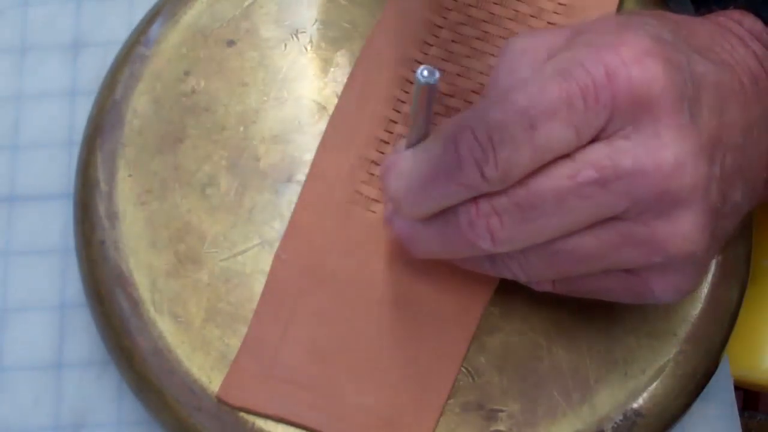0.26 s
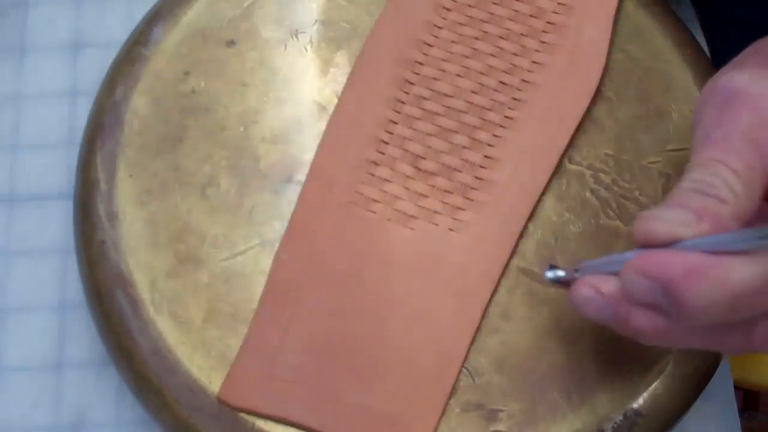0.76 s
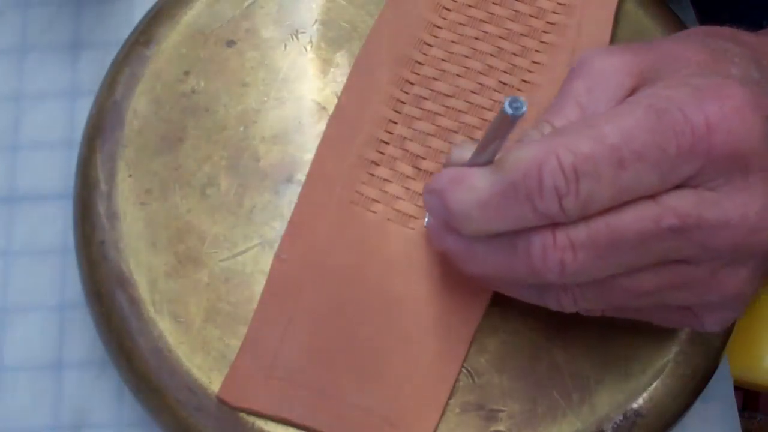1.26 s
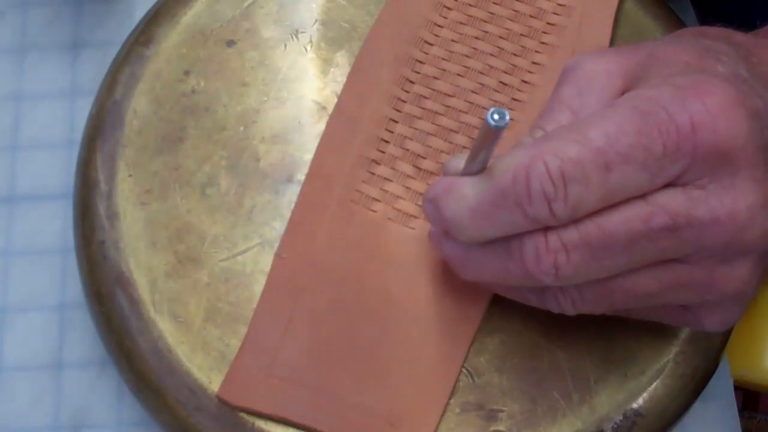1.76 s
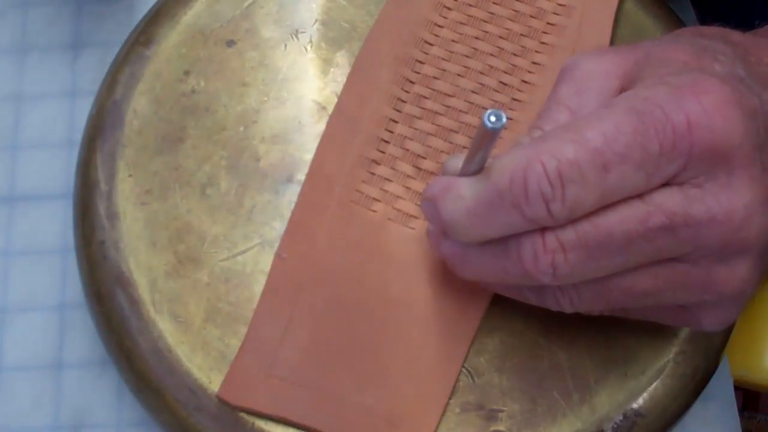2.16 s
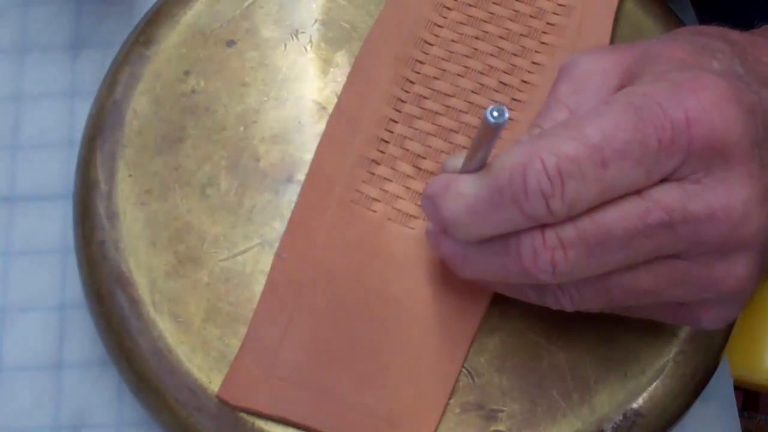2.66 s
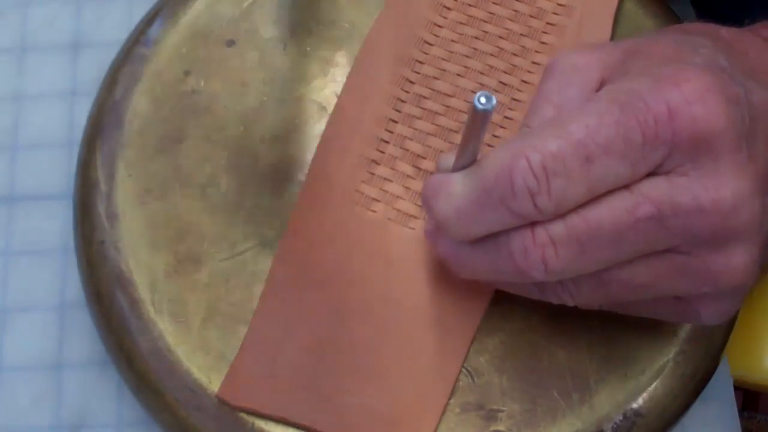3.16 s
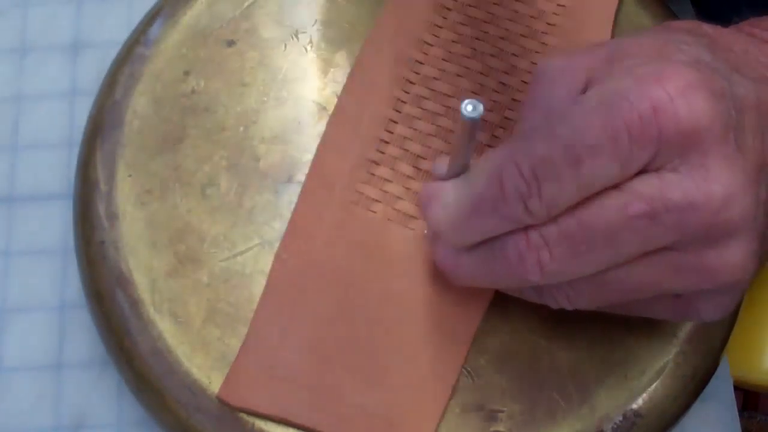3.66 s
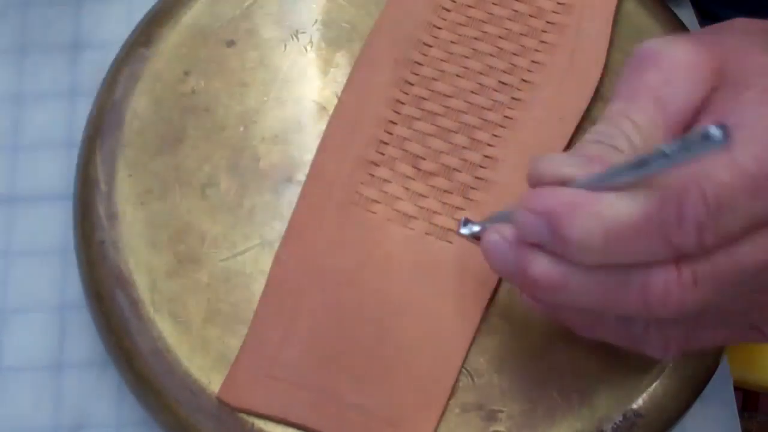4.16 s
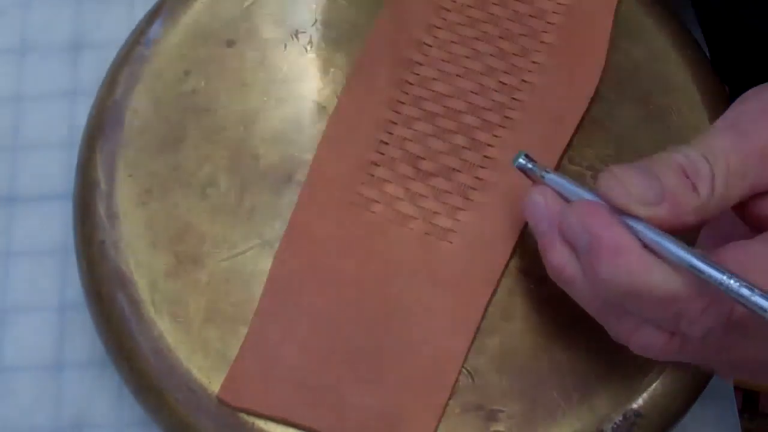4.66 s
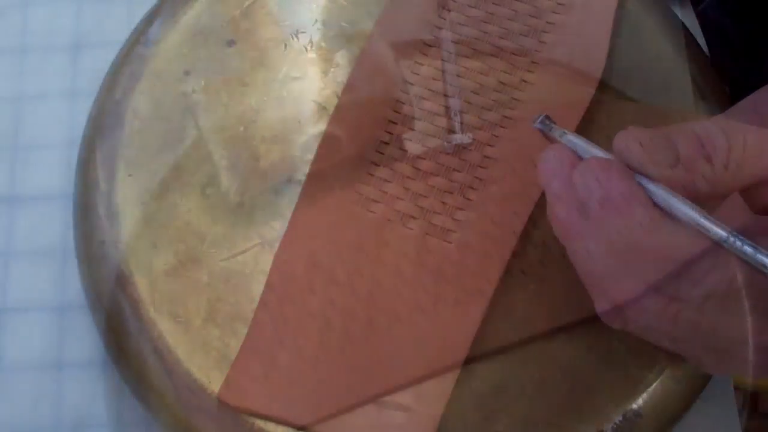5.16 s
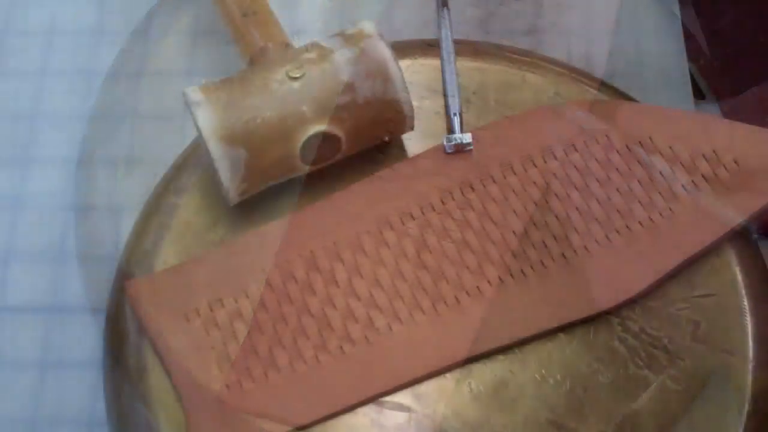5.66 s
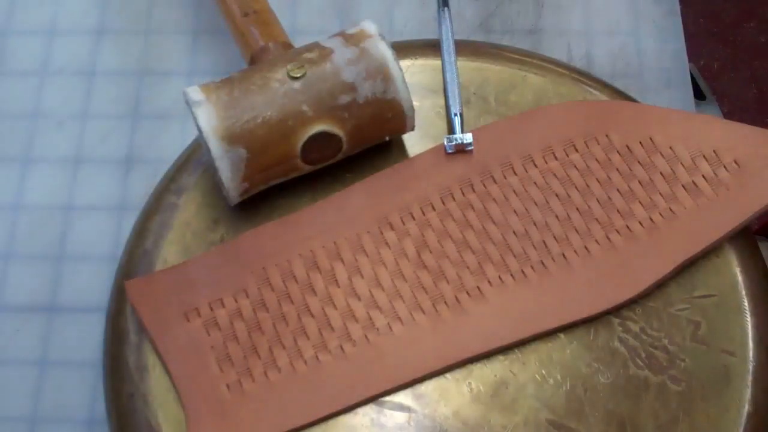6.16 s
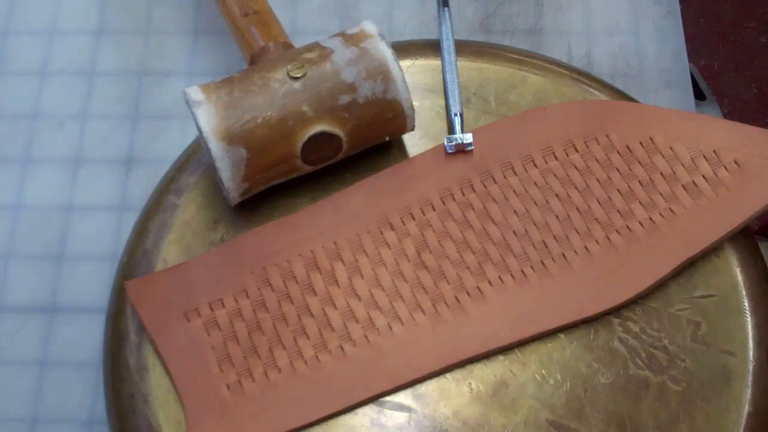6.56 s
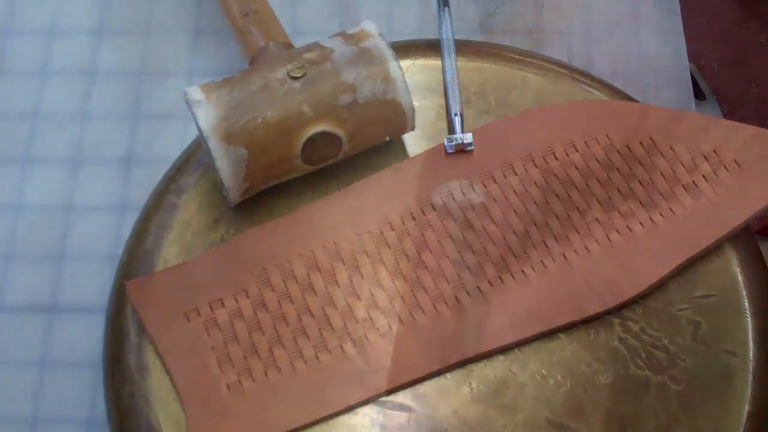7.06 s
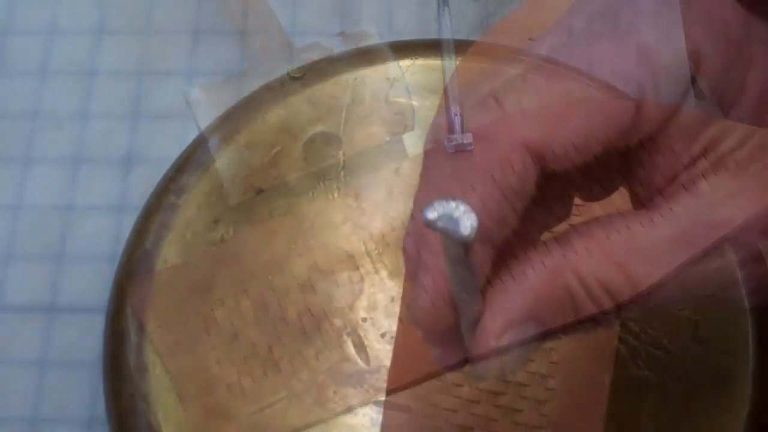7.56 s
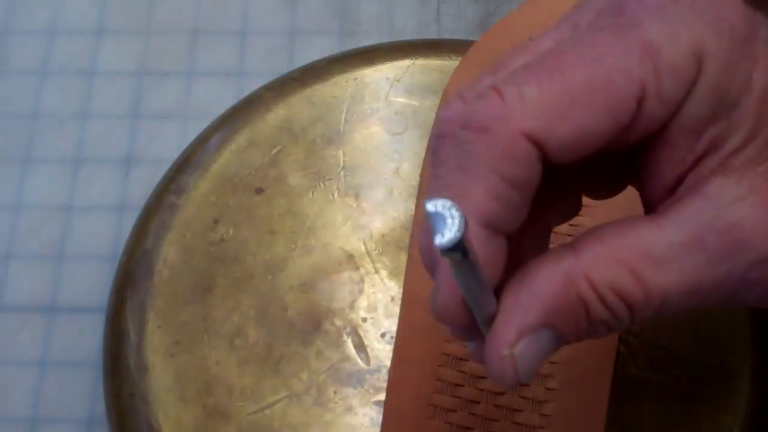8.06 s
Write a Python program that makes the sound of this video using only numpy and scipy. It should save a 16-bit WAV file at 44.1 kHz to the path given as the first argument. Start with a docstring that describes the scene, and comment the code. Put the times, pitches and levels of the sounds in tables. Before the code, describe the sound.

A rawhide mallet hits a steel stamp twice in quick succession, driving it into leather on a brass tray with sharp cracks and a brief metallic ring. About three seconds later comes a second pair. The mallet then thuds and clatters onto the bench, and hands lightly tap and rub the work. The microphone is close, in a small workshop with a steady low hum and thin motor whine.

```python
"""Leather tooling at the workbench

A stereo microphone stands close to a brass tray. A rawhide mallet drives a steel stamp into leather in
two pairs of blows; steel, tray and bench ring, and each blow overloads the input and ducks the gain.
The mallet is dropped on the bench. Hands tap and rub the work over room air, hum and a small motor."""
import sys
import numpy as np
from scipy import signal
from scipy.fft import rfft, irfft
from scipy.io import wavfile
from scipy.ndimage import minimum_filter1d

SR = 44100
rng = np.random.default_rng(int(sys.argv[2]) if len(sys.argv) > 2 else 0)


def wrap_up_sound(samples):
    """Save the sound to the file named by the first command line argument, as 16-bit audio."""
    columns = np.atleast_2d(samples).T
    # keep every value between -1 and 1, then stretch to whole-number steps
    tamed = np.clip(columns, -1, 1)
    steps = np.round(tamed * 32767).astype(np.int16)
    wavfile.write(sys.argv[1], SR, steps)


N = 365588
TIME = np.arange(N) / SR
T = np.arange(SR) / SR  # one second of ringing

# modes of the bench top: f/Hz, level/dB, t60/s
BENCH_TOP = [(76, -39, 0.5), (121.3, -38, 0.58), (155.5, -14.5, 0.27), (175, -37, 0.76), (239, -19.5, 0.25),
             (279.5, -30, 0.76), (349.4, -22, 0.38), (396.5, -31, 0.36), (463, -24.5, 0.45)]


def gain_of(db):
    """Decibels to amplitude."""
    return 10 ** (np.asarray(db) / 20)


def unit_rms(x):
    """Scales to rms 1."""
    return x / np.sqrt(np.mean(x ** 2) + 1e-20)


def at_hz(points, hz):
    """Reads a table on a log-frequency axis."""
    f, value = np.transpose(points)
    return np.interp(np.log(hz + 1), np.log(f + 1), value)


def add(mix, s, sound):
    """Adds a sound to both channels at time s."""
    part = mix[:, round(s * SR):][:, :sound.shape[-1]]
    part += sound[..., :part.shape[1]]


def low_pass(x, hz):
    """Steep band limit."""
    return signal.oaconvolve(x, signal.firwin(401, hz, window=("kaiser", 9), fs=SR)[None], "same")


def low_cut(x, hz, order=2):
    """Gentle bass roll-off."""
    return signal.sosfilt(signal.butter(order, hz, "high", fs=SR, output="sos"), x)


def drift(rate_hz):
    """Random wander of rms 1, mostly slower than rate_hz."""
    roll_off = 1 + (np.fft.rfftfreq(N, 1 / SR) / rate_hz) ** 4
    return unit_rms(irfft(rfft(rng.standard_normal(N)) / roll_off, N))


def diffuse(spectrum, size):
    """Coloured noise of rms 1 at two close capsules: alike in the bass, unrelated in the treble."""
    # likeness of left and right: f/Hz, coherence
    coherence = [(60, 0.7), (300, 0.94), (700, 0.82), (1400, 0.52), (3100, 0.018), (7000, 0.0075)]
    hz = np.fft.rfftfreq(size, 1 / SR)
    mid, side = np.exp(2j * np.pi * rng.random((2, len(hz))))
    alike = np.clip(at_hz(coherence, hz), -1, 1)
    mid, side = mid * np.sqrt(1 + alike), side * np.sqrt(1 - alike)
    return unit_rms(irfft(np.array([mid + side, mid - side]) * gain_of(at_hz(spectrum, hz)), size))


def ring(modes):
    """Dying sines (f/Hz, level/dB, t60/s), neighbours swinging in opposite directions."""
    return sum((-1) ** k * gain_of(db - 60 * T / t60) * np.sin(2 * np.pi * hz * T)
               for k, (hz, db, t60) in enumerate(modes))


def room_tail(spectrum):
    """Scattered reflections of energy 1 a channel, each band dying at its own speed."""
    # reverberation of the workshop: f/Hz, t60/s
    decay = [(100, 0.33), (500, 0.42), (1500, 0.29), (4000, 0.37), (8000, 0.32), (14000, 0.18)]
    hz, t, bands = signal.stft(diffuse(spectrum, SR), SR, nperseg=256)
    bands = bands * gain_of(-60 * t / at_hz(decay, hz)[:, None])
    tail = signal.istft(bands, SR, nperseg=256)[1][:, :SR] * (1 - np.exp(-T / 0.00086))
    return tail / np.sqrt((tail ** 2).sum() / 2)


def in_room(x, wet_db, treble_db):
    """Direct sound plus the workshop's reflections."""
    reflections = room_tail([(50, 0.00142), (900, 0.0064), (2500, treble_db), (15000, treble_db)])
    return x + gain_of(wet_db) * signal.fftconvolve(x, reflections, axes=1)[:, :N]


def room_air(wash_fade, air_db=-50.5, wash_db=-60):
    """Moving air and microphone hiss; a low wash fades in under them."""
    # spectrum of air and hiss: f/Hz, level/dB
    air = [(25, -19.5), (80, -8), (140, -8.5), (200, -8), (290, -1), (450, -4.5), (750, -5), (1100, -6),
           (1400, -4.5), (1800, -13), (3000, -14.5), (7000, -17), (11000, -17.5), (14000, -14.5)]
    # spectrum of the wash: f/Hz, level/dB
    wash = [(60, -45), (90, -20), (115, 4.5), (190, -9), (290, 6), (420, -0.5), (800, -25), (3000, -64)]
    steady = gain_of(air_db) * diffuse(air, N) * gain_of([[.7], [-.7]])
    return steady + gain_of(wash_db) * diffuse(wash, N) * wash_fade


def mains_hum(waver=0.28):
    """Hum in the centre, each tone wavering in level and phase."""
    # tones of the hum: f/Hz, rms level/dB
    tones = [(120, -67), (240, -59), (360, -63.5), (482, -67.5), (791, -71), (1053, -70)]
    hum = np.zeros(N)
    for hz, db in tones:
        tone = np.exp(2j * np.pi * (hz * TIME + rng.random()))
        wavering = 1 + waver * (drift(7.8) + 1j * drift(7))
        hum += gain_of(db) * (tone * wavering).real
    return np.sqrt(2) * hum


def motor(wash_fade, dips, waver_db=1.1, octave_db=-60, octave_waver_db=2.5, third_db=-74):
    """A thin whine wanders in pitch and level; its octave gains 1 dB with the wash and takes the dips."""
    # pitch of the whine: t/s, f/Hz
    pitch_curve = [(0, 657), (1, 658), (5.4, 658), (6.1, 663), (7.1, 663.5), (7.8, 659.5)]
    # strength of the fundamental: t/s, rms level/dB
    level = [(0, -48.5), (3.7, -48), (5.3, -53), (5.9, -60.5), (7.05, -67.5), (7.6, -56.5), (8.29, -51)]
    pitch_hz, whine_db = (np.interp(TIME, *np.transpose(curve)) for curve in (pitch_curve, level))
    phase = 2 * np.pi * np.cumsum(pitch_hz + 0.32 * drift(3.34)) / SR
    whine = gain_of(whine_db + waver_db * drift(3.9)) * np.sin(phase)
    octave = gain_of(octave_db + wash_fade + octave_waver_db * drift(21)) * np.sin(2 * phase)
    third = gain_of(third_db) * np.sin(3 * phase)
    return np.sqrt(2) * (whine + dips * octave * gain_of([[2], [-2.5]]) + third)


def stamp_blows(scatter_db=19, splash_db=-7, splash_s=0.0034, slap_db=-3, slap_s=.0019):
    """Mallet on stamp. The first of a pair barks and seats it; the second cracks less and rings more."""
    # mallet blows: t/s, force/dB, seating of the stamp/0-1, hardness/dB
    blows = [(0.2705, -2, 0, -1), (0.4895, -2, 0.91, -1), (3.7462, -2.5, 0.11, 2), (3.9746, -2.5, 1, 4)]
    # dead thump of the stamp entering leather: f/Hz, level/dB, t60/s
    thump = [(234, 6.5, 0.012), (564, 17.5, 0.0078), (988, 16.5, 0.0088)]
    # crack of the mallet face: f/Hz, level/dB, t60/s
    face_modes = [(2922, 5, 0.0075), (6050, 2, 0.0034), (8150, -1, 0.0023), (12010, -6.5, 0.0028)]
    # modes of tray and bench: f/Hz, level/dB, t60/s
    tray = [(80, -25, .45), (148, -22, .4), (167, -21, .5), (228, -28, .3), (355, -24, .33),
            (482, -17, .31), (511, -17, .2), (587, -22, .27), (607, -21, .25), (851, -25, .24),
            (942, -23, .22), (998, -26, .3), (1845, -31, .24), (2616, -31, .3), (2790, -31, .28),
            (2960, -34, .3)]
    # spectrum of a blow scattered by the room: f/Hz, level/dB
    scatter_spectrum = [(40, -8.5), (150, 2), (500, -1.5), (1000, 1.5), (1450, -8.5), (1900, -11.5),
                        (3000, -5.5), (4300, -17), (7000, -24.5), (14000, -23.5)]
    strikes, ringing = np.zeros((2, 2, N))
    scatter = gain_of(scatter_db) * room_tail(scatter_spectrum)
    bright_tail = low_cut(scatter, 1500, order=1)
    splash = diffuse([(100, -12.5), (2500, -7.5), (5000, -3.5), (14000, -15.5)], SR)
    splash *= gain_of(splash_db) * np.exp(-T / splash_s)
    crack = (ring(face_modes) + splash) * gain_of([[1.2], [-1.2]])
    body = ring(thump) + ring(tray) + scatter - bright_tail
    for s, force_db, seated, hard_db in blows:
        body_db, crack_db = -3.1 + 1.76 * seated, hard_db - 3.5 * seated
        bark = ring([(1830, 10.5 - 17.5 * seated, .013)])
        face = gain_of(crack_db) * crack - bark
        tail = gain_of(1.9 * crack_db) * bright_tail  # a duller crack leaves a duller tail
        add(strikes, s, gain_of(force_db) * (gain_of(body_db) * body + face + tail))
        add(strikes, s + slap_s, gain_of(force_db + crack_db + slap_db) * crack)  # back off the tray
        add(ringing, s, gain_of(force_db) * steel_ring(seated, hard_db))
    ringing = in_room(ringing, wet_db=-13, treble_db=0)  # reflections make the notes flutter
    return in_room(strikes, wet_db=-20, treble_db=4) + ringing


def steel_ring(seated, hard_db, beat_hz=7, low_rise_s=.016):
    """The stamp's low note swells in, its high note beats with a twin; hard blows wake the overtones."""
    # the steel's two main notes: f/Hz, t60/s
    notes = [(2202, .55), (3701, .2)]
    # its faint overtones: f/Hz, level/dB, t60/s
    upper_modes = [(4560, -44, .55), (4920, -40, .27), (7098, -40, .31), (9270, -47, .45), (10520, -43, .4)]
    (low_hz, low_t60), (high_hz, high_t60) = notes
    low_db, high_db = -25 + 0.5 * seated + hard_db / 2, -12.5 + 5 * seated + 1.4 * hard_db
    low = ring([(low_hz, low_db, low_t60)]) * (1 - np.exp(-T / low_rise_s))
    high = ring([(high_hz, high_db, high_t60)])
    twin = ring([(high_hz + beat_hz, .3 * high_db - 20, 0.1)])
    overtones = gain_of(-5 + 2.4 * hard_db) * ring(upper_modes)
    return low * gain_of([[-.5], [.5]]) + (high + twin) * gain_of([[1], [-1]]) + overtones


def rubbing(full_drag_s=0.28, grain_db=2.5):
    """Skin slides on leather in grainy swells; the longer the stroke, the more drag under its hiss."""
    # finger strokes: t/s, length/s, level/dB
    strokes = [(0.748, 0.11, -54), (1.745, 0.078, -51.5), (2.74, 0.066, -49.5), (3.118, 0.037, -52),
               (4.313, 0.11, -52.5), (4.459, 0.23, -42.5), (5.611, 0.14, -45.5), (5.79, 0.19, -54),
               (6.338, 0.075, -52.5), (6.808, 0.21, -51), (7.572, .07, -55.5)]
    # spectrum of light brushing: f/Hz, level/dB
    hiss_spectrum = [(1000, -49), (3000, -0.5), (5000, 0.5), (7000, -2.5), (9500, -3), (12700, 3),
                     (14300, -3), (15000, -30)]
    # spectrum of dragged leather: f/Hz, level/dB
    drag_spectrum = [(30, -35), (90, -8), (300, 2), (1000, -2), (2000, -1.5), (4000, -16), (9000, -28)]
    hiss, drag = np.zeros((2, N))
    for s, length, db in strokes:
        swell = gain_of(db) * np.cos(np.pi * np.clip((TIME - s) / length, -.5, .5))
        hiss += swell
        drag += swell * length / full_drag_s
    friction = hiss * diffuse(hiss_spectrum, N) + drag * diffuse(drag_spectrum, N)
    return friction * gain_of(grain_db * drift(160))


def knock(db, hz, t60, click_db, rise_cycles=0.49, click_s=0.0034):
    """A damped swing that builds up while the contact lasts, and the click of touching."""
    # spectrum of the click: f/Hz, level/dB
    click_spectrum = [(60, -25), (200, 5), (900, 8), (2000, -1.5), (3500, -2.5), (5000, -12), (9000, -11),
                      (15000, -17)]
    swing = low_cut(ring([(hz, db, t60)]), 0.77 * hz)  # little bass under the swing
    click = gain_of(click_db) * diffuse(click_spectrum, SR) * np.exp(-T / click_s)
    return swing * (1 - np.exp(-T * hz / rise_cycles)) + click


def tapping(decay_cycles=12.2, nudge_s=1.038, nudge_db=-30):
    """Hands and tools tap lightly; the stamp set down on the leather nudges the bench's lowest modes."""
    # light taps: t/s, level/dB, f/Hz, click/dB
    taps = [(3.1265, -27.5, 2470, -36), (4.286, -31.5, 3060, -38.5), (5.5835, -26, 1883, -59),
            (5.676, -22.5, 860, -33), (5.7759, -28, 1000, -44), (6.487, -23.5, 1180, -28),
            (6.491, -23.5, 1050, -34), (6.7969, -29, 810, -35.5), (6.847, -20.5, 875, -36),
            (6.8547, -16.5, 1080, -33.5), (6.9701, -33, 1010, -40), (7.7398, -26, 996, -42)]
    out = np.zeros((2, N))
    for s, db, hz, click_db in taps:
        add(out, s, knock(db, hz, decay_cycles / hz, click_db))
    add(out, nudge_s, gain_of(nudge_db) * ring(BENCH_TOP[:3]))
    return in_room(out, wet_db=-3.5, treble_db=2.5)


def mallet_drop(thud_t60=0.0071, bench_rise_s=0.0042, clink_s=4.5878):
    """The head thuds, rocks and clacks on the bench; steel tools or the tray clink at the last landing."""
    # landings of the head: t/s, thud/dB, f/Hz, hardness/dB, bench ring/dB
    landings = [(4.4605, 19.5, 264, -27.5, 8.5), (4.498, 13.5, 794, -8, 5.5), (4.526, -15, 786, -42, 1),
                (4.564, 8.5, 540, -20.5, -1.5), (4.5887, 4.5, 960, -9.5, -8)]
    # modes of the rawhide head: f/Hz, level/dB, t60/s
    head = [(1310, -9, 0.0042), (1820, 2.5, 0.0067), (2300, -1, 0.0032)]
    # modes of a bright metallic clink: f/Hz, level/dB, t60/s
    clink = [(845, -30, 0.33), (1474, -26, 0.089), (2890, -10, 0.0072), (3150, -14.5, 0.053),
             (3500, 5, 0.002), (5270, -23.5, 0.054)]
    impacts, bench = np.zeros((2, 2, N))
    for s, db, hz, hard_db, bench_db in landings:
        clack = gain_of(23 + 3.07 * hard_db) * ring(head)  # grows faster than the click
        add(impacts, s, knock(db, hz, thud_t60, hard_db) + clack)
        add(bench, s, gain_of(bench_db) * ring(BENCH_TOP) * (1 - np.exp(-T / bench_rise_s)))
    add(impacts, clink_s, ring(clink))
    return low_cut(in_room(impacts, wet_db=-7.5, treble_db=-5.5) + bench, 70)


def scene(wash_from_s=5.8, wash_rise_s=0.2):
    """The work lies close, a little left of the microphone, with the workshop's room tone behind."""
    # the background sinks briefly: t/s, half width/s, depth/dB
    lulls = [(5.55, 0.3, 3), (7.4, 0.35, 4)]
    work = (stamp_blows() + mallet_drop() + tapping() + rubbing()) * gain_of([[.4], [-.4]])
    dips = gain_of(-sum(db * np.exp(-((TIME - s) / width) ** 2) for s, width, db in lulls))
    wash_fade = np.clip((TIME - wash_from_s) / wash_rise_s, 0, 1)
    room_tone = dips * (room_air(wash_fade) + mains_hum()) + motor(wash_fade, dips)
    return low_pass(work + room_tone, 14300)


def record(dry, threshold_db=-20, depth_db=6.0, hold_s=0.19, recover_db_per_s=42, attack_s=0.0038,
           ceiling=0.98):
    """Automatic gain ducks just after each blow, holds and recovers; the first milliseconds overload."""
    over_db = np.clip(20 * np.log10(abs(dry).max(0) + 1e-9) - threshold_db, 0, depth_db)
    half = int(hold_s * SR / 2)
    held_db = -minimum_filter1d(-over_db, 2 * half + 1, origin=half, mode="constant")
    recovery_db = TIME * recover_db_per_s
    target_db = np.maximum.accumulate(held_db + recovery_db) - recovery_db
    pole = np.exp(-1 / (attack_s * SR))
    duck_db = signal.lfilter([1 - pole], [1, -pole], target_db)
    return low_pass(np.clip(dry * gain_of(-duck_db), -ceiling, ceiling), 15628)


dry = scene()
out = record(dry)
wrap_up_sound(out)
```